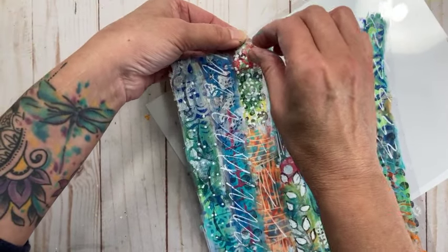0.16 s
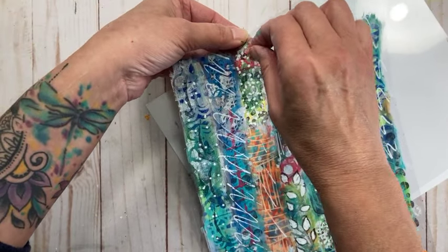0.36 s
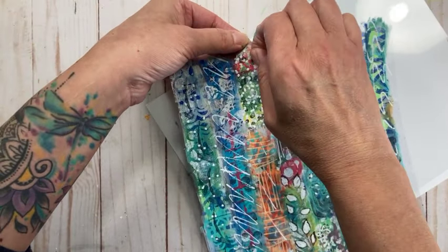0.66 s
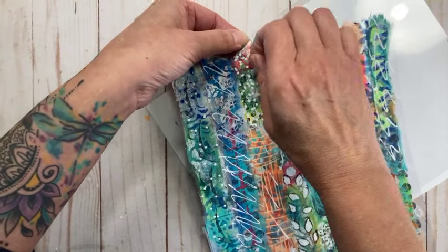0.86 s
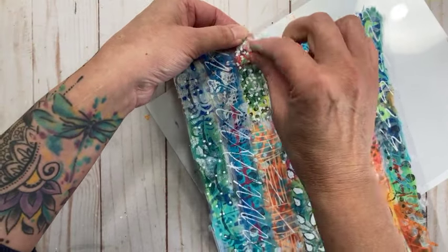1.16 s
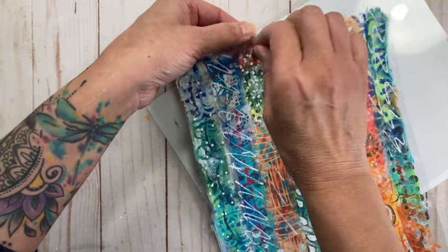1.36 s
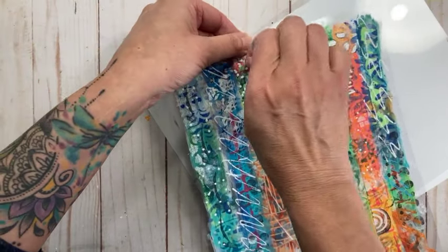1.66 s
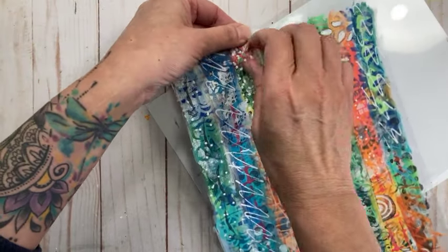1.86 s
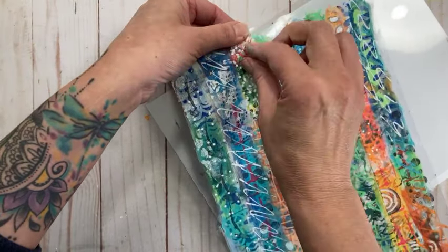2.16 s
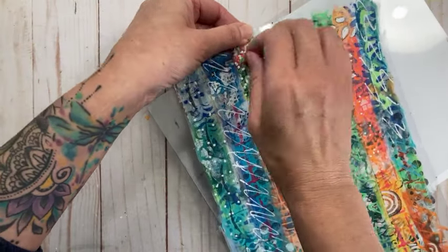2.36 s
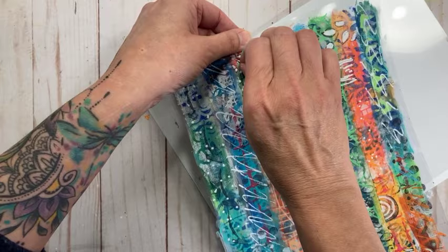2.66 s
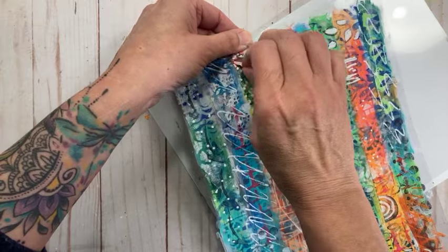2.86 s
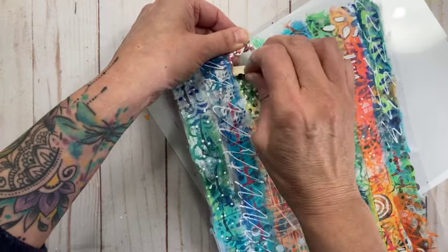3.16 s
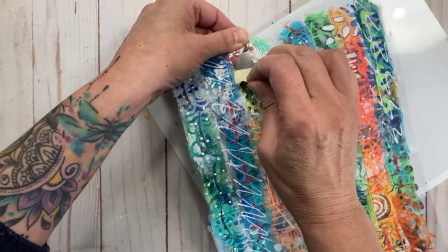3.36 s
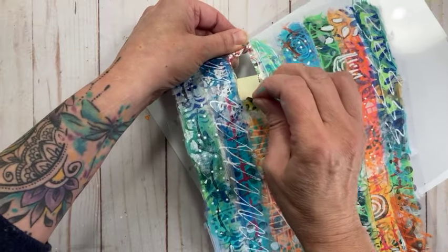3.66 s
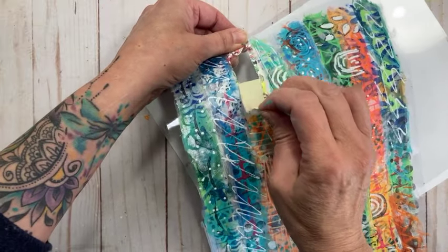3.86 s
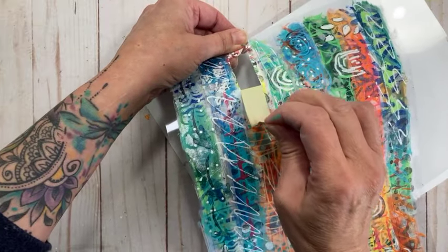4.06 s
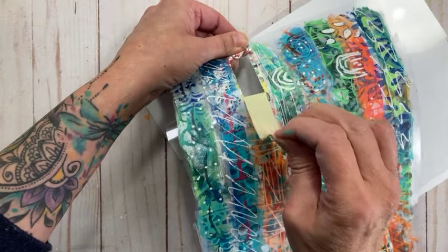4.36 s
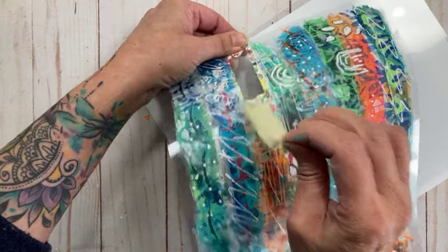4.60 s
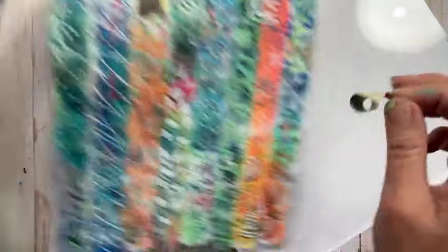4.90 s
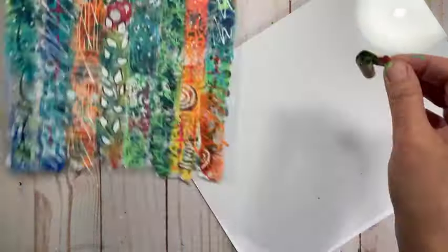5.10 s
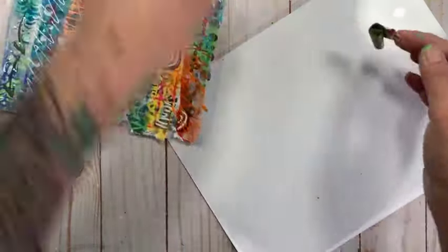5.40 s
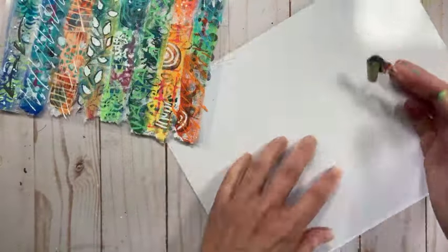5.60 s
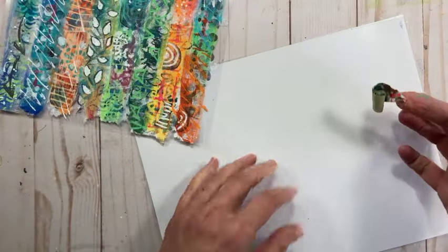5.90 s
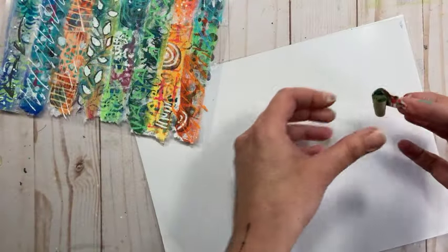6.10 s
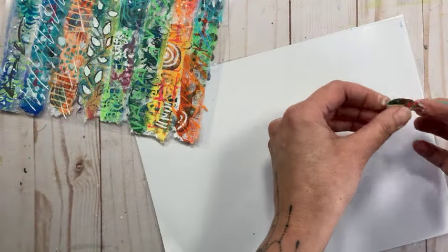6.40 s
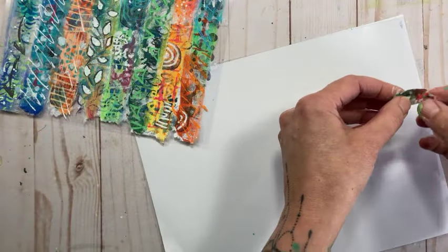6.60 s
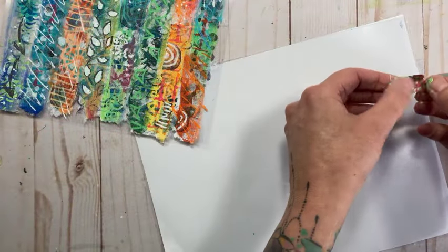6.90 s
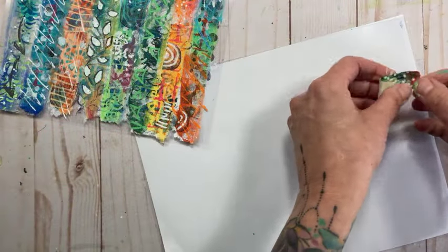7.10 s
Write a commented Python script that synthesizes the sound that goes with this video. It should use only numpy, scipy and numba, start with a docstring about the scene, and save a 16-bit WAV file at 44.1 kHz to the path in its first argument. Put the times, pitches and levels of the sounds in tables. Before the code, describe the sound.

Small scratchy ticks and snaps, a slow crackly tape peel, a sharp snap as it comes free, sheet scuffs, one palm hiss on paper, tiny crinkles.

```python
"""Close on a table in a quiet room, one microphone hanging above: a fingernail picks at a strip of painted
masking tape on a plastic sheet, with sharp snaps and taps, then peels it slowly. Glue threads snap as dense
random crackle that rings the sheet, fizzes in the treble and shakes the freed strip. The sheet scuffs aside
with soft table bumps, a palm hisses over the paper beneath, and fingers uncurl the strip in short rustles.
Noise and random crackle drive every sound, through resonances or broad filters; a short echo follows."""
import sys
import numpy as np
from scipy import signal
from scipy.fft import rfft, irfft
from scipy.io import wavfile
from scipy.ndimage import uniform_filter1d
from numba import njit

SR = 44100
rng = np.random.default_rng(int(sys.argv[2]) if len(sys.argv) > 2 else 0)


def unload_audio(sound):
    """Save the sound as a 16-bit wav file, at the path given as the first command line argument."""
    columns = np.transpose(np.atleast_2d(sound))
    # keep every value between -1 and 1, then stretch to whole-number steps
    steps = np.round(np.clip(columns, -1, 1) * 32767)
    wavfile.write(sys.argv[1], SR, steps.astype(np.int16))


N = 319725  # samples

# In resonance tables width_hz is the bandwidth. Spectrum tables give only a shape, as density per hertz.
# room tone spectrum: freq_hz, level_db
ROOM_SPECTRUM = [(15, -68), (25, -49), (53, -2.5), (107, -5.5), (299, -14), (342, -16), (670, -23),
                 (788, -20.5), (3860, -32.5), (11400, -30.5), (15700, -25)]
# nail strokes at the tape edge: start_s, end_s, rub_start_db, rub_end_db, fizz_relative_db
NAIL_STROKES = [(0, 0.066, -55.5, -60, -14.5), (0.103, 0.115, -53, -66, -24), (0.133, 0.158, -58, -74, -16),
                (0.209, 0.327, -63, -68, -20), (0.408, 0.433, -58, -52, -33),
                (0.437, 0.49, -44.5, -59.5, -24), (0.52, 0.632, -56.5, -59, -30),
                (0.663, 0.72, -68, -68.5, -22), (0.751, 0.855, -79.5, -61.5, 2.5),
                (0.852, 0.96, -49.5, -55, -6), (0.939, 1.06, -69, -65.5, -4),
                (1.056, 1.101, -50, -51.5, -4), (1.11, 1.15, -73, -76, -17),
                (1.178, 1.273, -56.5, -68, -11), (1.264, 1.426, -53, -55.5, -10),
                (1.428, 1.49, -65.5, -54, -16), (1.473, 1.543, -56, -70, -4),
                (1.535, 1.619, -54, -56, -6.5), (1.62, 1.745, -62.5, -64, 0.5),
                (1.744, 1.813, -49.5, -50, -2.5), (1.8, 1.881, -47.5, -70, 1.5),
                (1.916, 1.982, -68, -53.5, -8.5), (1.981, 2.067, -47.5, -55.5, -9),
                (2.087, 2.152, -67, -58, -16), (2.242, 2.287, -68, -57, -16),
                (2.281, 2.362, -51, -71, -2.5), (2.36, 2.412, -53.5, -49, -2.5),
                (2.415, 2.501, -55, -72, -8.5)]
# resonances of the tape edge under the nail, before a pitch factor: pitch_hz, width_hz, level_db
EDGE_MODES = [(524, 128, -11.5), (1292, 214, 5), (1990, 420, 3.5), (2530, 280, 1), (3650, 430, -12)]
# spectrum of glue lifting under the nail: freq_hz, level_db
SCRAPE_SPECTRUM = [(2400, -43), (3200, -13), (4500, -4.5), (6200, -4.5), (7870, -1), (11000, -2),
                   (15100, 1.5), (15700, -5.5)]
# snaps and taps: start_s, body_peak_db, pitch_hz, treble_relative_db
SNAP_EVENTS = [(0.439, -50, 1960, -32), (0.531, -49, 1500, -25), (0.621, -54, 1580, -9),
               (0.832, -45.5, 1590, -6), (0.884, -37, 2720, -19), (0.91, -38, 1030, 2.5),
               (1.055, -38, 1100, -24), (1.063, -24, 1030, -8), (1.177, -47, 1250, -25),
               (1.185, -42, 2380, -27), (1.357, -39.5, 2300, -26), (1.489, -28, 1790, -10.5),
               (1.621, -46.5, 2080, 8.5), (1.65, -51, 2100, 16), (1.679, -49.5, 1960, 11.5),
               (1.731, -47, 1470, 8), (1.788, -44, 1530, 3), (1.806, -29.5, 1570, -13),
               (1.972, -31, 1230, -33), (2.077, -48.5, 2200, 6), (2.105, -37, 1380, -20),
               (2.110, -42, 1900, -2), (2.278, -41.5, 2160, 5), (2.596, -31, 1460, 3.5),
               (2.65, -54, 1370, -10), (3.525, -30, 1350, -17), (3.567, -33.5, 2250, 9.5),
               (3.811, -28.5, 1070, 4), (3.904, -39, 1120, -7), (4.122, -30, 1070, 4.5),
               (4.378, -28, 780, 1), (4.697, -34, 751, 8), (4.75, -19.5, 1370, -2), (4.84, -28, 1110, -3),
               (4.908, -47, 1770, 7), (4.925, -41, 2056, -1), (4.987, -26.5, 2270, -12),
               (5.035, -46.5, 760, -11), (5.086, -36.5, 950, -6), (5.107, -33.5, 988, -24),
               (5.132, -36.5, 1290, 4), (5.173, -45, 1110, -11), (5.201, -35, 1150, -17),
               (5.308, -37.5, 1123, -6), (5.328, -43.5, 1500, -8), (6.404, -63.5, 1820, 10),
               (6.418, -50.5, 2070, -20), (6.606, -57, 1082, 11), (6.865, -57.5, 1540, 12),
               (6.952, -60, 1380, 19), (6.988, -54, 1370, 25.5), (7.003, -43, 3500, 9)]
# table knock under each snap: pitch_hz, width_hz, level_db
KNOCK_MODES = [(563, 365, 0)]
# spectrum of snapping glue heard in the air: freq_hz, level_db
FIZZ_SPECTRUM = [(2650, -69), (4500, -35), (6660, -7), (7870, 2), (10500, 3), (13500, 2.5), (15100, 8),
                 (15700, -0.5)]
# crackling force as the pull varies: time_s, level_db
PEEL_PULL = [(2.53, -71), (2.56, -56), (2.75, -59), (3.05, -60), (3.17, -51.5), (3.5, -50), (3.78, -47.5),
             (3.95, -42.5), (4.04, -48.5), (4.13, -45), (4.17, -54), (4.33, -47.5), (4.43, -58.5),
             (4.65, -58.5), (4.72, -48.5)]
# sheet's upper modes during the peel, relative to that force: time_s, relative_db
PEEL_UPPER = [(2.53, -6), (3.0, -4), (3.2, -4.5), (3.9, -8.5), (4.3, -7), (4.72, -4.5)]
# lower modes of the sheet, before a pitch factor: pitch_hz, width_hz, level_db
SHEET_LOW_MODES = [(1147, 400, 4), (1340, 825, -0.5)]
# upper modes of the sheet: pitch_hz, width_hz, level_db
SHEET_HIGH_MODES = [(1892, 270, 3), (2334, 300, 4.5), (3780, 440, 0), (5800, 1350, -9)]
# modes of the loose strip, before a pitch factor: pitch_hz, width_hz, level_db
STRIP_MODES = [(260, 150, -13), (536, 90, -7), (602, 296, 3)]
# hands and arms bump the table top: start_s, hold_s, level_db
TABLE_BUMPS = [(4.739, .02, -53.5), (4.896, 0.016, -54.5), (5.156, 0.031, -60), (5.318, 0.023, -62.5),
               (5.557, 0.032, -56.5), (5.766, 0.013, -68)]
# table-top resonances: pitch_hz, width_hz, level_db
TABLE_MODES = [(66, 32, -1), (145, 45, 0.5), (286, 107, -1)]
# scuffs of the sheet dragged aside: start_s, hold_s, ring_db, fizz_relative_db, flap_relative_db
DRAG_SCUFFS = [(4.74, 0.0069, -47, 1, 9), (4.77, 0.035, -59, -2, -5), (4.848, 0.015, -54.5, -4, 0),
               (4.909, 0.023, -60.5, 10.5, 6.5), (4.952, .045, -69.5, 19, -6), (5.029, 0.017, -64, 9.5, 3),
               (5.11, 0.043, -60, 1, 1.5), (5.177, 0.033, -54.5, 5.5, -3.5), (5.301, 0.047, -60, 5, -6),
               (5.387, 0.049, -81.5, 20.5, -10), (5.504, 0.057, -64.5, -3, 1.5), (5.597, .045, -75.5, 3, 3)]
# palm in full contact with the paper: start_s, hold_s, level_db
PALM_SWIPES = [(5.803, 0.092, -41.5)]
# paper hiss spectrum: freq_hz, level_db
PAPER_SPECTRUM = [(290, -51.5), (500, -22), (648, -28.5), (853, -17.5), (2740, -0.5), (3170, -4.5),
                  (5720, -6), (7740, -1.5), (15700, 0.5)]
# fingers uncurl the strip: start_s, hold_s, level_db
UNCURL_RUSTLES = [(6.17, .07, -74.5), (6.41, 0.023, -72), (6.59, 0.037, -73), (6.738, 0.11, -69),
                  (6.865, 0.014, -58), (6.924, .035, -60.5), (6.992, 0.013, -52), (7.035, .03, -76.5),
                  (7.189, .03, -68), (7.24, .02, -51.5)]
# rustle spectrum: freq_hz, level_db
RUSTLE_SPECTRUM = [(590, -69), (1000, -8.5), (1640, -12), (1800, -9), (3630, -19.5), (4800, -15),
                   (6500, -3), (8240, 0), (11000, -5), (15700, -6)]

ROOM_DB = -71
KNOCK_DB = -15  # relative to the body of a 1200 Hz snap
PEEL_START_S = 2.5
FLAP_DB, FLAP_DB_PER_DECADE = -8.5, 24.5  # flap after one second of peeling; growth per tenfold time
PEEL_FIZZ_DB = 1.1  # relative to the crackling force
SINK_FROM, SINK_TO, SINK_S = 1.244, 0.8, 1.34  # pitch factors of the sheet's lower modes; time constant in s
LOOSE_PITCH = 0.897  # pitch factor of the lower modes while the sheet is dragged
SCUFF_UPPER_DB, UPPER_PER_FIZZ = -1, 0.57  # dB; bright scuffs also ring the upper modes more (dB per dB)
# contact slopes, dB per s
SCUFF_RISE, SCUFF_FALL = 650, 490
BUMP_RISE, BUMP_FALL = 310, 340
SWIPE_RISE, SWIPE_FALL, EDGE_RATE = 113, 114, 500  # the last acts outside touch and lift
RUSTLE_RISE, RUSTLE_FALL = 790, 650
TOUCH_S, LIFT_S = 5.67, 5.99  # the palm meets and leaves the paper
ECHO_T60_S, ECHO_DB = 0.25, -11.5
TOP_HZ = 15800


def undb(db):
    """Decibels to gain."""
    return 10 ** (np.asarray(db) / 20)


def unit(x):
    """Scale to rms 1."""
    return x / np.sqrt(np.mean(x ** 2))


def read(table):
    """A level curve in dB over time, silent outside the table."""
    return np.interp(np.arange(N) / SR, *np.transpose(table), left=-150, right=-150)


def colour(x, spectrum):
    """Causal minimum-phase filter through spectrum points; white input keeps its rms."""
    hz, db = np.transpose(spectrum)
    f = np.fft.rfftfreq(4096, 1 / SR)
    log_gain = np.interp(np.log(f + 1), np.log(hz), db) * np.log(10) / 20
    # folding the cepstrum onto positive times puts all the response after the input
    cepstrum = irfft(log_gain)
    cepstrum[1:2048] *= 2
    cepstrum[2049:] = 0
    response = irfft(np.exp(rfft(cepstrum)))
    return signal.fftconvolve(x, response / np.sqrt(np.sum(response ** 2)))[:N]


def ring(x, modes):
    """Fixed steep resonances, each three peaks in a row; white input of rms 1 gives rms 1."""
    response = 0
    for hz, width, db in modes:
        b, a = signal.iirpeak(hz, hz / width / 2, SR)
        mode = signal.unit_impulse(4096)
        for _ in range(3):
            mode = signal.lfilter(b, a, mode)
        response = response + undb(db) * mode
    return signal.fftconvolve(x, response / np.sqrt(np.sum(response ** 2)))[:len(x)]


@njit
def band(x, hz, width):
    """State-variable band-pass whose centre moves."""
    y, b, l = np.empty(len(x)), 0., 0.
    for i in range(len(x)):
        g, k = np.tan(np.pi * hz[i] / SR), width / hz[i]
        v = (b + g * (x[i] - l)) / (1 + g * (g + k))
        b, l, y[i] = 2 * v - b, l + 2 * g * v, k * v
    return y


def walk(rate):
    """Random levels drawn rate times a second and joined by ramps; rms 1."""
    step = int(SR / rate)
    levels = np.repeat(rng.standard_normal(N // step + 1), step)
    return unit(uniform_filter1d(levels, step)[:N])


def bend(x, modes, factor, wander, rate):
    """Steep resonances of a flexing sheet: every mode drifts on its own around factor times its pitch."""
    out = 0
    for hz, width, db in modes:
        centre = hz * factor * np.exp(wander * walk(rate))
        mode = x + 1e-18  # keeps the filter off denormal numbers
        for _ in range(3):  # three double-width bands together are about width wide
            mode = band(mode, centre, 2. * width)
        out = out + undb(db) * mode
    noise_power = sum(undb(2 * db) * width for hz, width, db in modes) * 2.4 / SR
    return out / np.sqrt(noise_power)


def crackle(rate, spread_db, burst_db, burst_rate, smooth_db):
    """Threads snap at random, some harder, in uneven bunches over a smooth rub; rms 1."""
    size = undb(spread_db * np.minimum(rng.exponential(size=N), 3))
    snap = (rng.random(N) < rate / SR) * size * rng.standard_normal(N)
    rub = undb(smooth_db) * rng.standard_normal(N)
    bunches = undb(burst_db * walk(burst_rate))
    return unit((unit(snap) + rub) * bunches)


def contact(start, hold, db, rise, fall):
    """Gain of contacts that swell, hold and die away at steady dB rates; their powers add."""
    t = np.arange(0, N + 32, 32) / SR  # coarse grid, interpolated below
    power = 0
    for start_s, hold_s, level_db in zip(start, hold, db):
        before, after = rise * (start_s - t), fall * (t - start_s - hold_s)
        drop_db = np.maximum(np.maximum(before, after), 0)
        power = power + undb(2 * (level_db - drop_db))
    return np.interp(np.arange(N) / SR, t, np.sqrt(power))


def glue(force, low, upper, flap, fizz, pitch):
    """One crackling force rings the sheet, fizzes in the air and shakes the loose strip."""
    wavering = force * undb(1.1 * walk(60))  # lower sheet modes and strip also waver randomly in level
    sheet = bend(wavering * low, SHEET_LOW_MODES, pitch, .035, 40)
    sheet = sheet + bend(force * upper, SHEET_HIGH_MODES, 1, .02, 20)
    strip = bend(wavering * flap, STRIP_MODES, 0.98, 0.15, 15)
    return sheet + strip + colour(force * fizz, FIZZ_SPECTRUM)


def room_tone():
    """Steady coloured noise of the quiet room, its level wandering slightly."""
    return colour(rng.standard_normal(N), ROOM_SPECTRUM) * undb(ROOM_DB + 0.63 * walk(2.804))


def pick():
    """The nail rubs the tape edge in short strokes; lifting glue fizzes on its own."""
    rub, fizz = np.zeros((2, N))
    for start, end, first_db, last_db, fizz_db in NAIL_STROKES:
        i, j = int(start * SR), int(end * SR)
        rub[i:j] = undb(np.linspace(first_db, last_db, j - i))
        fizz[i:j] = rub[i:j] * undb(fizz_db)
    rub, fizz = uniform_filter1d([rub, fizz], size=260)  # contact starts and ends within a few ms
    edge = bend(rub * crackle(1800, 2.5, 2.9, 90, -1.7), EDGE_MODES, 0.95, 0.1, 18)
    return edge + colour(fizz * crackle(1700, 6.1, 2.9, 100, 0.63), SCRAPE_SPECTRUM)


def echo(near):
    """Short echo off table and walls: decaying noise from 3 ms after the direct sound."""
    t = np.arange(SR // 4) / SR
    tail = rng.standard_normal(len(t)) * undb(-60 * t / ECHO_T60_S) * (t > .003)
    return undb(ECHO_DB) * signal.fftconvolve(near, tail / np.sqrt(np.sum(tail ** 2)))[:N]


def peak(x):
    """Scale to peak 1."""
    return x / np.abs(x).max()


def snaps():
    """Each snap is one crack with a faint spray behind it; the sheet rings a few cycles at its own pitch."""
    out = np.zeros(N)
    t = np.arange(2048) / SR
    sprays = rng.standard_normal((len(SNAP_EVENTS), len(t)))
    for (start, db, hz, treble_db), spray in zip(SNAP_EVENTS, sprays):
        crack = spray * (np.exp(-t / 0.0013) + 0.31 * np.exp(-t / 0.0056))
        body = peak(ring(crack, [(hz, 0.5 * hz, 0), (3900, 1600, -18)]))
        thud = peak(ring(crack, KNOCK_MODES))
        bright = peak(colour(crack, FIZZ_SPECTRUM)[:len(t)])
        # low-pitched snaps bend more of the sheet and knock the table harder
        snap = body + undb(KNOCK_DB) * 1200 / hz * thud + undb(treble_db) * bright
        i = int(start * SR)
        out[i:i + len(t)] += undb(db) * snap
    return out


def peel():
    """The freed strip flaps more and lowers the sheet's lower modes as it grows."""
    freed = np.maximum(np.arange(N) / SR - PEEL_START_S, .01)  # s of peeling
    flap_db = FLAP_DB + FLAP_DB_PER_DECADE * np.log10(freed)
    sink = SINK_TO + (SINK_FROM - SINK_TO) * np.exp(-freed / SINK_S)
    force = crackle(4500, 3.5, 2.6, 170, -1.5) * undb(read(PEEL_PULL))
    return glue(force, 0.95, undb(read(PEEL_UPPER)), undb(flap_db), undb(PEEL_FIZZ_DB), sink)


def bumps():
    """Hands and arms bump the table top, whose low modes ring to soft bursts of noise."""
    push = contact(*np.transpose(TABLE_BUMPS), BUMP_RISE, BUMP_FALL)
    return ring(rng.standard_normal(N) * push, TABLE_MODES)


def drag():
    """The sheet scuffs over the table in separate contacts, some dull, some bright."""
    start, hold, db, fizz_db, flap_db = np.transpose(DRAG_SCUFFS)
    upper_db = SCUFF_UPPER_DB + UPPER_PER_FIZZ * fizz_db
    # gains in the order glue() takes them: low, upper, flap, fizz
    gains = [contact(start, hold, db + relative_db, SCUFF_RISE, SCUFF_FALL)
             for relative_db in (0, upper_db, flap_db, fizz_db)]
    return glue(crackle(2500, 2.16, 3.5, 90, 0.6), *gains, LOOSE_PITCH)


def swipe():
    """The palm sweeps the paper: dense crackle hisses, cut off steeply outside touch and lift."""
    middle, half = (TOUCH_S + LIFT_S) / 2, (LIFT_S - TOUCH_S) / 2
    off = np.maximum(np.abs(np.arange(N) / SR - middle) - half, 0)  # s outside contact
    palm = contact(*np.transpose(PALM_SWIPES), SWIPE_RISE, SWIPE_FALL) * undb(-EDGE_RATE * off)
    return colour(crackle(4000, 2.2, .9, 90, 5) * palm, PAPER_SPECTRUM)


def uncurl():
    """Fingers uncurl the strip: brief contacts let through a bright crackling rustle."""
    fingers = contact(*np.transpose(UNCURL_RUSTLES), RUSTLE_RISE, RUSTLE_FALL)
    return colour(crackle(3000, 3.3, 2.0, 80, 2.4) * fingers, RUSTLE_SPECTRUM)


def scene():
    """Handling sounds with their echo over room tone, the same in both channels."""
    near = pick() + snaps() + peel() + bumps() + drag() + swipe() + uncurl()
    return np.tile(near + echo(near) + room_tone(), (2, 1))


def record(dry):
    """The recorder cuts the top steeply with an elliptic low-pass."""
    return signal.sosfilt(signal.ellip(14, .2, 70, TOP_HZ, fs=SR, output="sos"), dry)


dry = scene()
out = record(dry)
unload_audio(out)
```